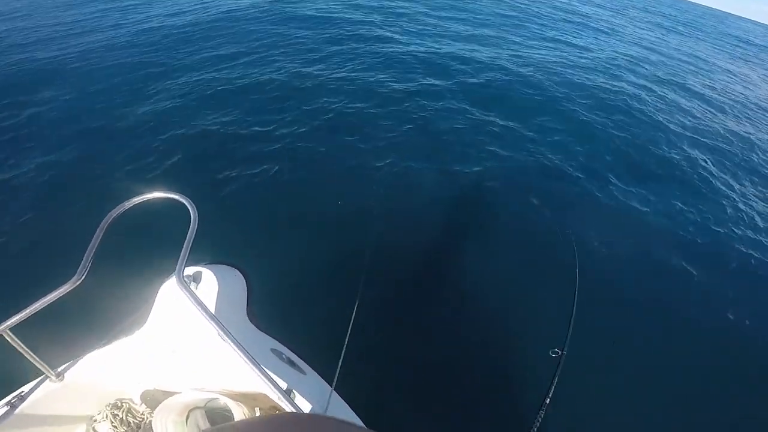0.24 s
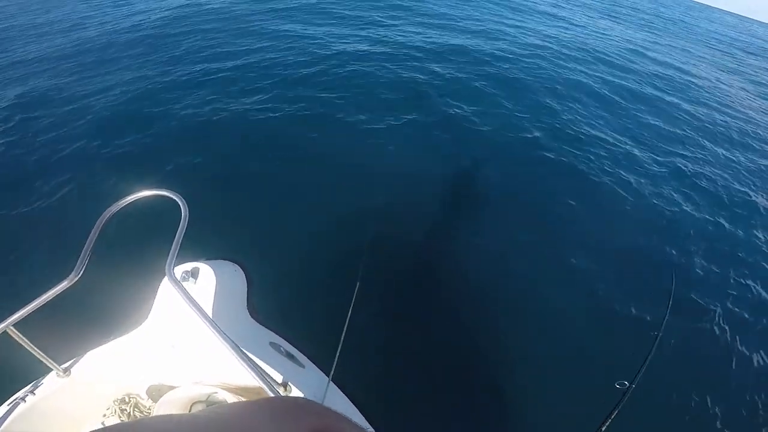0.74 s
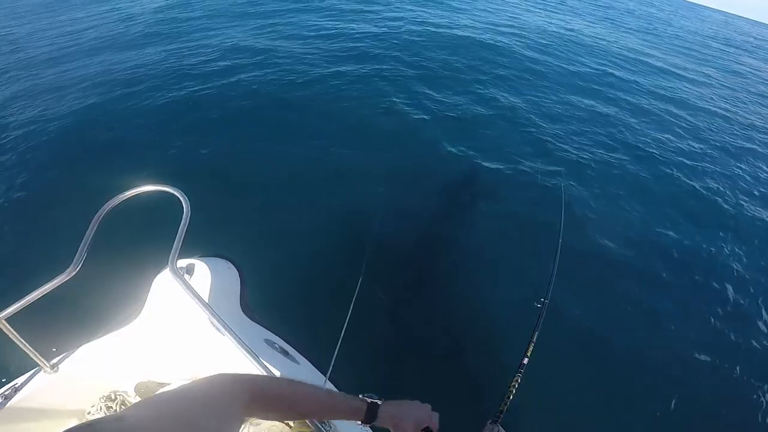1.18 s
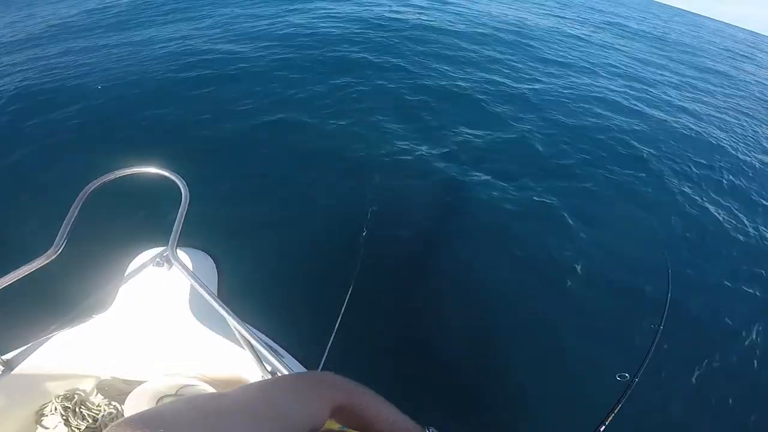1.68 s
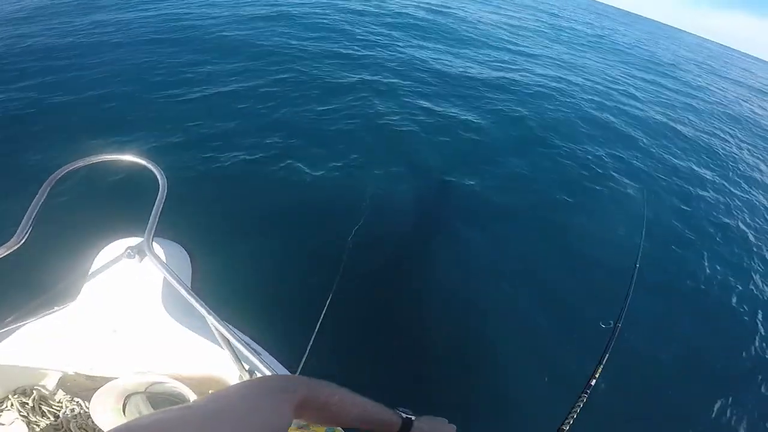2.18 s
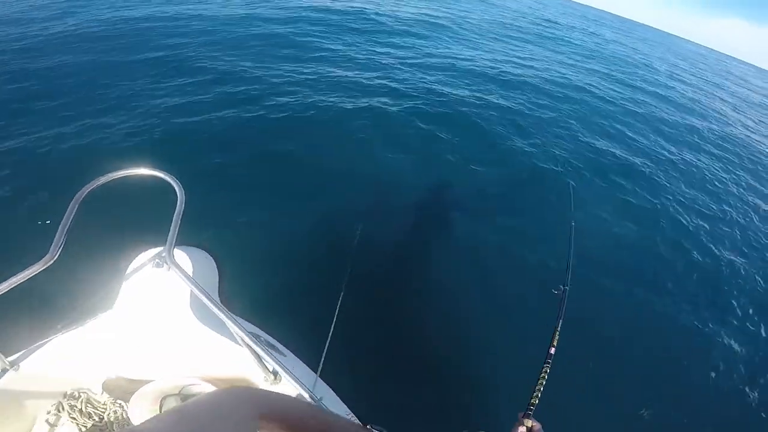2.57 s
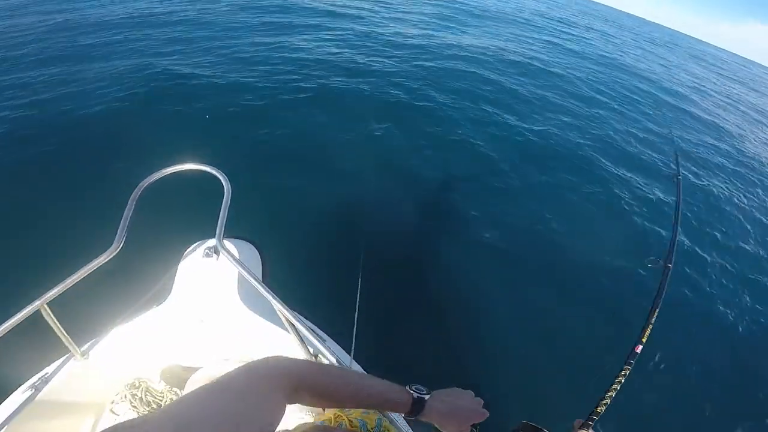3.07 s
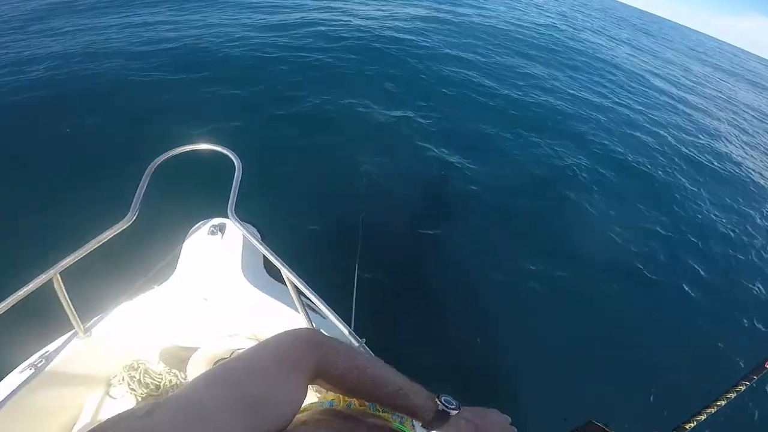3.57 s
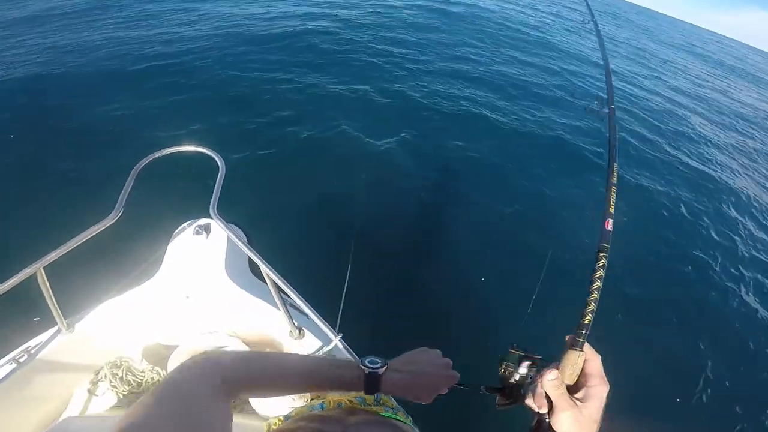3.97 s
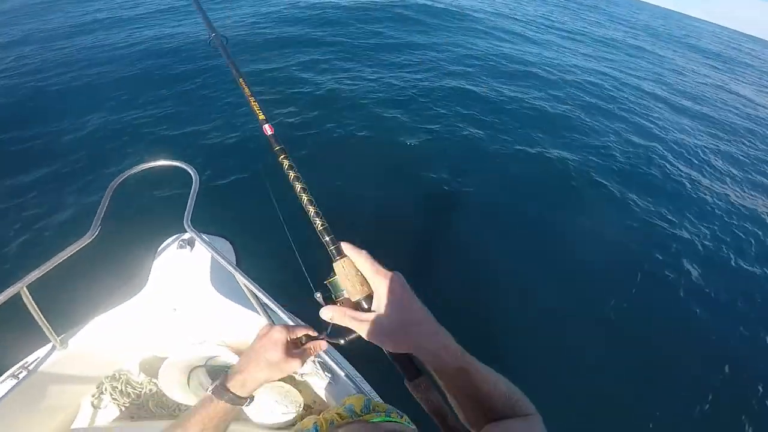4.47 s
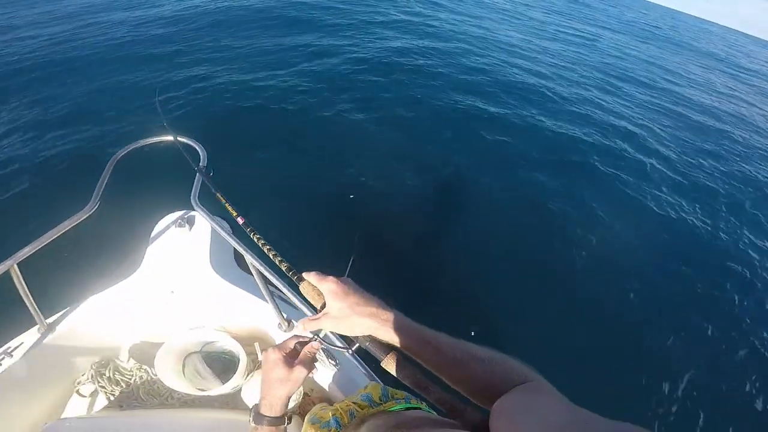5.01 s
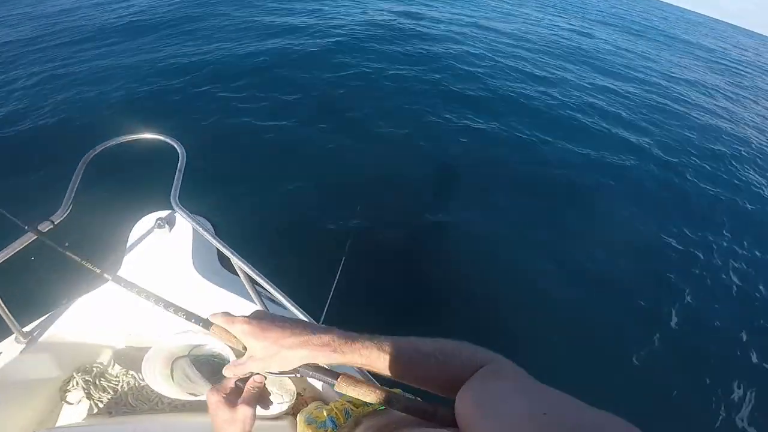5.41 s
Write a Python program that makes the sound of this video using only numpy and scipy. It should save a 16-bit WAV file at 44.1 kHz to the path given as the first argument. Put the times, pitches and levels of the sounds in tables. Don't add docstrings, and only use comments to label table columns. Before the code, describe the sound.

Whirring reel strokes, quick ratchet clicks and hissing line close by, with dull knocks, hollow water slaps and a deep steady drone.

```python
import sys
import numpy as np
from scipy import signal
from scipy.io import wavfile
from scipy.ndimage import uniform_filter1d

SR = 44100
rng = np.random.default_rng(int(sys.argv[2]) if len(sys.argv) > 2 else 0)


def wav_record(signal):
    frames = np.transpose(np.atleast_2d(signal))
    bounded = np.clip(frames, -1, 1)
    quanta = np.round(bounded * 32767).astype(np.int16)
    wavfile.write(sys.argv[1], SR, quanta)


def elevation(decibels):
    levels = np.asarray(decibels, float)
    return 10 ** (levels / 20)


N = 249165
CLOCK = np.arange(N) / SR

# (frequency [Hz], density [dB per Hz])
WIND_SPECTRUM = [(41, -44), (70, -10), (119, -1), (167, 0), (360, -14), (424, -17), (490, -19.5),
                 (700, -26.5), (910, -68), (1540, -120)]
# (frequency [Hz], density [dB per Hz])
DRONE_SPECTRUM = [(20, -13), (32, 16.5), (50, 5.5), (85, -4), (130, -33)]
# (middle [s], width [s], level [dB])
GUSTS = [(0.03, 0.089, -52), (1.28, 0.13, -41.5), (1.56, 0.19, -28.5), (1.8, 0.21, -46.5),
         (2.33, 0.05, -40), (2.85, 0.33, -53), (4.3, 0.6, -52), (4.65, 0.24, -49), (5.0, 0.15, -46.5),
         (5.22, 0.028, -47)]
# (frequency [Hz], density [dB per Hz])
LAPPING_SPECTRUM = [(250, -73), (350, 4.5), (500, -1.5), (800, -1.5), (1200, -8), (1600, -19.5)]
# (frequency [Hz], density [dB per Hz])
WASH_SPECTRUM = [(240, 10.5), (400, -5.5), (510, 1), (828, -20), (907, -3), (1190, -1), (1770, 0),
                 (1930, -3.5), (4250, -11), (6410, -7), (12300, -22), (15000, -0.5)]
# (time [s], peak [dB], centre [Hz], t60 [s])
SPRAY = [
    (3.7, -37.5, 5540, 0.45),
    (0.32, -51, 2600, 0.072),
    (4.96, -47, 3500, 0.29),
]
# (frequency [Hz], density [dB per Hz])
ROCKING_SPECTRUM = [(2.9, -50), (5.0, 3), (15, 3), (26, -13.5), (49, -18.5), (75, -27.5), (90, -66),
                    (120, -97), (200, -120)]
# (time [s], level [dB])
SWAY = [(0.06, -27.5), (0.38, -39.5), (0.58, -25), (0.72, -41), (0.77, -24), (1.13, -48.5), (1.23, -25.5),
        (1.78, -50), (1.81, -25.5), (2.1, -27), (2.4, -28.5), (2.7, -29.5), (3.1, -27), (3.6, -32.5),
        (3.85, -30.5), (4.06, -27), (4.25, -17), (4.83, -31), (4.99, -15), (5.13, -24.5), (5.37, -16.5),
        (5.51, -48.5), (5.65, -25)]
# (time [s], peak [dB], pitch [Hz], t60 [s], noise
# burst near 570 Hz re peak [dB])
WAVELET_BLOWS = [(0.291, -29.5, 170, 0.05, -26), (0.64, -36, 166.5, 0.28, -27), (2.312, -30, 191, 0.055, -25),
                 (2.343, -26, 115.4, 0.11, -27), (2.751, -25.5, 150, 0.049, -26), (2.766, -28, 138, 0.068, -30),
                 (3.7, -12, 190.6, 0.045, -32), (3.72, -25.5, 230, 0.11, -21), (3.745, -27.5, 179.6, 0.2, -23),
                 (4.05, -36, 119, 0.15, -5), (4.973, -24.5, 275, 0.047, -32), (4.966, -23.5, 125.5, 0.08, -33),
                 (4.997, -22, 139.2, 0.1, -33), (0.305, -35, 228, 0.052, -20),
                 (2.406, -38.5, 387, 0.047, -21), (2.6, -44, 303, 0.1, -20), (2.734, -31.5, 430, 0.016, -35),
         (2.753, -36, 425, 0.026, -22), (2.775, -35, 258, 0.075, -24), (3.045, -39.5, 315, 0.023, 1),
         (3.292, -41, 459, 0.061, -1), (4.035, -43.5, 684, 0.045, -17), (4.09, -45, 790, 0.12, -20),
         (3.695, -26.5, 526, 0.032, -24), (3.783, -27.5, 473, 0.024, -20), (4.376, -35.5, 280.4, 0.13, -8),
         (4.958, -33, 490, 0.015, -1), (4.931, -39, 340, 0.042, -12), (5.003, -33, 246, 0.056, -22),
         (5.025, -34.5, 223, 0.1, -23), (5.168, -41, 496, 0.035, -1)]
# (time [s], peak [dB], pitch [Hz], length [s])
DROPS = [(0.049, -43, 1650, .01), (0.056, -45, 1550, .012), (0.089, -38, 1850, .014),
         (0.135, -47, 1250, .012), (0.304, -48, 3200, .008), (0.306, -45, 1550, .01),
         (0.842, -45, 1840, .022), (1.117, -44, 1850, .022), (2.385, -41, 440, .03),
         (2.545, -42, 1950, .02), (2.578, -37, 310, .048), (3.891, -46, 2050, .014),
         (4.005, -46, 3270, .012), (4.033, -46, 2150, .016), (4.083, -44, 1900, .016),
         (4.271, -46, 3350, .014), (4.422, -39, 1900, .018), (4.443, -41, 1870, .016),
         (4.482, -39, 1880, .02), (4.622, -43, 1800, .018), (4.645, -40, 1790, .022)]
# (time [s], peak [dB], pitch [Hz], t60 [s], bright crack re peak [dB])
KNOCKS = [(0.0355, -22, 715, 0.0076, -17), (0.0368, -24.5, 1250, 0.011, -28), (0.297, -41, 423, 0.01, -11),
          (0.566, -44, 497, 0.1, -26), (0.716, -32, 565, 0.025, -22), (0.718, -37, 920, 0.012, -27),
          (1.411, -33.5, 1260, 0.018, -25), (2.3035, -32.5, 763, 0.028, -30),
          (2.3035, -33.5, 614, 0.032, -30), (1.412, -37, 915, 0.042, -32), (3.045, -42, 780, 0.025, -2),
          (4.928, -37.5, 560, 0.011, -8), (4.958, -38, 674, 0.0091, -13),
          (0.296, -40.5, 1730, 0.017, -5), (0.616, -46.5, 1900, 0.11, -9), (1.412, -30.5, 1780, 0.011, -33),
          (1.5234, -26.5, 1610, 0.0038, -14), (1.552, -19, 1010, 0.0054, -22),
          (1.554, -32.5, 4200, 0.0065, -20), (1.574, -19, 1165, 0.018, -32),
          (1.729, -37.5, 1850, 0.0082, -6.5), (3.135, -45.5, 1490, 0.044, -10),
          (4.927, -39, 1650, 0.019, -23), (4.961, -37, 1870, 0.013, -15), (4.992, -40, 1650, 0.018, -10),
          (4.976, -28.5, 1555, 0.014, -29), (5.136, -42, 1770, 0.069, -7)]
# (time [s], peak [dB], pitch [Hz])
SNAPS = [(0.042, -32, 4450), (1.051, -31, 5460), (1.521, -43, 5550), (1.5313, -35, 4700), (1.54, -28, 5800),
         (1.554, -34, 4100), (2.9027, -26, 5300), (3.042, -32, 5550), (3.702, -24, 5050),
         (3.919, -30, 5300), (4.0106, -24, 4750), (4.0923, -20, 6830), (4.3514, -31, 6330),
         (5.004, -32, 5500), (5.0835, -22.5, 5620)]
# (start [s], teeth [count], first gap [ms], gap change [ms per tooth])
SLIPS = [(0.0766, 4, 34.8, -5.35), (0.1902, 10, 28.6, -1.38), (0.4204, 8, 24.3, 1.08),
         (0.6412, 9, 22.6, -1.48), (0.7971, 9, 14.2, 1.31), (0.9799, 4, 43.6, 7.3),
         (1.1951, 3, 57.9, -22.4), (1.3175, 5, 20.2, -2.91), (1.3991, 9, 11.6, 2.2),
         (1.5832, 6, 27.7, -1.09), (1.7296, 9, 17.9, -0.02), (2.409, 4, 16.9, 1.05),
         (2.4914, 4, 24.4, 2.05), (2.5896, 8, 18.2, 2.46), (2.7971, 5, 25.4, -2.63),
         (2.9387, 7, 22.0, -1.72), (3.0649, 12, 20.4, 0.21), (3.3188, 6, 26.8, -0.62),
         (3.9559, 6, 24.3, -0.86), (4.1202, 5, 16.1, 2.51), (4.2165, 7, 16.3, -0.24),
         (4.7786, 9, 17.0, 0.03), (4.9276, 7, 18.3, 0.19), (5.0666, 4, 29.5, -4.1), (5.177, 8, 27.9, -1.8),
         (5.3546, 6, 19.6, 0.99)]
# (time [s], tick level [dB])
PULL = [(0.05, -50.5), (.38, -42), (.6, -45), (1.0, -43), (1.4, -45), (1.8, -46), (2.5, -57), (2.8, -44),
        (3.05, -44.5), (3.35, -45.5), (4.0, -41), (4.3, -46), (4.9, -43.5), (5.15, -45.5), (5.29, -47),
        (5.45, -45.5)]
# (frequency [Hz], t60 [s], level [dB])
PAWL_MODES = [(3005, 0.049, -10.5), (5300, 0.049, -9.5), (6400, 0.021, -4), (7150, 0.012, -6),
              (8670, 0.012, -5.5)]
# (start [s], length [s], pitch [Hz], level [dB])
RUBS = [(0.96, 0.38, 5000, -56), (2.192, 0.16, 5000, -52), (3.453, 0.38, 2780, -50.5),
        (3.47, 0.39, 6200, -51), (3.583, 0.19, 6700, -46.5), (4.326, 0.11, 4200, -54),
        (4.5, 0.12, 4500, -48), (4.544, 0.2, 5300, -58), (5.46, 0.19, 5500, -52), (5.541, 0.2, 5600, -44.5),
        (5.554, 0.09, 3140, -46), (3.786, 0.12, 5470, -51), (3.792, 0.089, 6800, -44),
        (4.327, 0.14, 2200, -50), (3.98, 0.19, 2260, -53), (4.0, 0.15, 3100, -54), (2.43, 0.21, 1580, -55),
        (3.99, 0.19, 1610, -52), (5.513, 0.25, 2050, -53), (4.02, 0.26, 1250, -54.5)]
# (frequency [Hz], width [Hz], level [dB])
SPOOL_MODES = [(4200, 440, 4), (4746, 130, 9.5), (5550, 350, 13), (6240, 82, 10.5), (6700, 36, 7),
               (3600, 1900, -1), (2990, 880, -6), (1900, 450, 6.5)]
# (frequency [Hz], width [Hz], level [dB])
BODY_MODES = [(1840, 92, 19.5), (1560, 70, 9), (2120, 70, 11), (2610, 70, 5)]
# (time [s], pitch ratio [1])
GRIP = [(.6, 1.03), (1.2, 0.99), (1.8, 0.92), (1.9, 1.02), (1.98, 1.05), (2.1, 0.97), (2.26, 1),
        (2.42, 0.97), (2.53, 0.94), (2.8, 1.03), (3.58, 0.97), (3.77, 1.06), (3.9, .96), (4.2, 1),
        (4.34, 0.95), (4.44, 0.94), (4.52, 0.97), (4.61, 0.93), (4.7, 0.95)]
# (start [s], length [s], gear whirr [dB], line hiss [dB], mesh tone [dB])
PUSHES = [(0.634, 0.36, -46.5, -48.5, -53), (0.949, 0.33, -49, -45, -56), (1.275, 0.17, -52.5, -51, -67),
          (1.747, 0.3, -51.5, -55, -67), (1.845, 0.27, -41.5, -50, -51), (1.991, 0.22, -43, -51.5, -65),
          (2.17, 0.34, -44, -47.5, -55), (2.426, 0.16, -49, -49, -55), (2.486, 0.33, -45, -47, -53.5),
          (2.75, 0.27, -61, -52.5, -67), (3.085, 0.15, -59, -59, -54), (3.227, 0.14, -53, -52.5, -59),
          (3.396, 0.14, -59, -52, -71), (3.464, 0.22, -46.5, -45, -47.5),
          (3.603, 0.24, -43.5, -42.5, -48.5), (3.779, 0.14, -55, -45.5, -47),
          (3.849, 0.17, -48.5, -45.5, -58), (3.955, 0.17, -48, -50, -56), (4.037, 0.26, -52, -47.5, -52.5),
          (4.225, 0.25, -55, -43.5, -46.5), (4.298, 0.12, -43.5, -55, -62), (4.389, 0.19, -42.5, -45, -48),
          (4.503, 0.16, -51, -46, -48), (4.576, 0.15, -41, -45.5, -51), (4.647, 0.18, -61, -47, -53),
          (5.433, 0.14, -58, -52, -50.5), (5.494, 0.13, -49, -47.5, -46.5), (5.56, 0.3, -64, -47, -46)]
# (time [s], rate [Hz])
CRANK_STROKES = [
    [(.6, 1090), (.72, 1900), (.8, 1550), (1.0, 2480), (1.21, 2580), (1.26, 1970)],
    [(1.86, 1520), (1.94, 2580), (2.08, 2400), (2.15, 1590), (2.24, 2790), (2.42, 1960), (2.46, 1630),
     (2.7, 1510), (2.86, 880)],
    [(3.45, 1090), (3.52, 1290), (3.59, 1690), (3.77, 1730), (3.81, 1510), (3.92, 990), (4.03, 1170),
     (4.09, 2150), (4.19, 2250)],
    [(4.25, 1180), (4.31, 1340), (4.36, 2040), (4.44, 1900), (4.55, 1790), (4.65, 1660), (4.69, 1420),
     (4.78, 990)],
    [(5.44, 695), (5.49, 1143), (5.522, 1320), (5.555, 2590), (5.6, 2460), (5.65, 2760)],
]
# (frequency [Hz], lead of the left port [rad])
PORT_PHASE = [(0, 0), (690, -3.1), (1290, -3.4), (1890, -4.9), (2670, -4.0), (3270, -5.6), (4310, -6.3),
              (5940, -8.5), (6460, -9.4), (7150, -8.6), (8530, -11.6), (9040, -10.4), (11300, -12.6),
              (14700, -12.7)]
# (frequency [Hz], left minus right [dB])
PORT_BALANCE = [(500, -2), (1000, -4), (2400, -1.5), (5000, -3), (9000, -4), (14000, 0)]
# (frequency [Hz], likeness [1])
PORT_COHERENCE = [(400, .3), (700, .5), (1200, .85), (2400, .38), (5000, .55), (9000, .15), (14000, .05)]

BREEZE_DB, DRONE_DB, LAPPING_DB, WASH_DB = -49.5, -43.5, -54, -47
HUM_HZ, HUM_WIDTH_HZ, HUM_DB = 103, 8, -46
SLOSH_LAG_S = 0.012
RUB_WIDTH_HZ = 380
ATTACK_S, RELEASE_S, SAG_DB_PER_S = 0.069, 0.084, 17
NEAR_BODY_DB_PER_OCTAVE = 2
TOP_HZ = 10830


def evened(x):
    return x / np.sqrt(np.mean(x ** 2) + 1e-20)


def steadied(x, size):
    return x / np.sqrt(uniform_filter1d(x ** 2, size=size) + 0.45)


def smoothed(x, size):
    return evened(uniform_filter1d(x, size=size))


def read(points, hz):
    f, value = np.transpose(points)
    return np.interp(np.log(hz + 1), np.log(f + 1), value)


def curve(points):
    return np.interp(CLOCK, *np.transpose(points))


def add(mix, s, sound):
    part = mix[round(s * SR):][:len(sound)]
    part += sound[:len(part)]


def layered(*sounds):
    out = np.zeros(max(map(len, sounds)))
    for sound in sounds:
        add(out, 0, sound)
    return out


def resonate(x, hz, width):
    turn = np.exp(2j * np.pi * np.cumsum(hz * np.ones(len(x))) / SR)
    r = np.exp(-np.pi * abs(width) / SR)
    return 2 * (turn * signal.lfilter([1 - r], [1, -r], x / turn)).real


def ring(hz, t60, rise_s):
    t = CLOCK[:round(SR * np.clip(t60, .002, .25))]
    envelope = elevation(-60 * t / max(t60, .002)) * (1 - np.exp(-t / abs(rise_s)))
    wave = envelope * np.sin(2 * np.pi * hz * t)
    return wave / abs(wave).max()


def burst(hz, width, t60):
    puff = rng.standard_normal(SR // 4)[:round(SR * np.clip(t60, .002, .25))]
    coloured = resonate(resonate(puff, hz, width), hz, width)
    return 2.8 * coloured * elevation(-60 * CLOCK[:len(puff)] / t60)


def noise(spectrum, patchy_db, flicker_db, size, channels=1):
    frames, hz = 4 * N // size + 5, np.fft.rfftfreq(size, 1 / SR)
    a, b, patches = rng.standard_normal((3, channels, len(hz), frames))
    patches = evened(uniform_filter1d(uniform_filter1d(patches, size=5, axis=1), size=8, axis=2))
    flicker = smoothed(rng.standard_normal(frames), 3)
    level = read(spectrum, hz)[:, None] + patchy_db * patches + flicker_db * flicker
    z = (a + 1j * b) * elevation(level)
    return evened(signal.istft(z, nperseg=size, noverlap=3 * size // 4)[1][:, :N])


def wind():
    turbulence = noise(WIND_SPECTRUM, patchy_db=0.5, flicker_db=-0.5, size=2048, channels=3)
    left, right, shared = steadied(turbulence, size=3000)
    drone = noise(DRONE_SPECTRUM, patchy_db=-1.0, flicker_db=1.5, size=4096, channels=3)
    blowing = elevation(BREEZE_DB)
    for s, width, db in GUSTS:
        blowing = blowing + elevation(db) * np.exp(-((CLOCK - s) / width) ** 2)
    low = signal.sosfiltfilt(signal.butter(2, 240, fs=SR, output="sos"), shared)
    opposed = (shared - low) * [[1], [-1]]
    gusts = blowing * (np.array([left, right]) + 0.54 * low + 0.44 * opposed)
    return gusts + elevation(DRONE_DB) * (drone[2] + .4 * drone[:2])


def water():
    swell = smoothed(uniform_filter1d(rng.standard_normal(N), size=4000), 4000)
    lapping = noise(LAPPING_SPECTRUM, patchy_db=1.0, flicker_db=-1.5, size=1024)[0]
    wash = noise(WASH_SPECTRUM, patchy_db=0.5, flicker_db=-1.5, size=512)[0]
    return elevation(LAPPING_DB + 1.5 * swell) * lapping + elevation(WASH_DB) * wash


def spray():
    out = np.zeros(N)
    for s, db, hz, t60 in SPRAY:
        fine = 0.21 * burst(2.1 * hz, 3500, 0.5 * t60)
        add(out, s, elevation(db) * layered(burst(hz, 1800, t60), fine))
    return out


def wavelets():
    out = np.zeros(N)
    for s, db, hz, t60, upper_db in WAVELET_BLOWS:
        slosh = 1.6 * burst(0.8 * hz, 175, 2.0 * t60)
        slosh *= 1 - np.exp(-CLOCK[:len(slosh)] / SLOSH_LAG_S)
        lingering = 0.043 * ring(1.45 * hz, 5.8 * t60, 0.017)
        upper = elevation(upper_db) * burst(570, 260, 0.068)
        blow = layered(ring(hz, t60, 0.00063), lingering, upper)
        add(out, s + 0.00047, elevation(db) * blow)
        add(out, s + SLOSH_LAG_S, elevation(db) * slosh)
    return out


def hull():
    sway = elevation(curve(SWAY))
    motion = noise(ROCKING_SPECTRUM, patchy_db=-3.5, flicker_db=-1.0, size=8192, channels=2)
    rocking, twist = steadied(motion, size=5000)
    hum = steadied(evened(resonate(rng.standard_normal(N), HUM_HZ, HUM_WIDTH_HZ)), size=20000)
    common = sway * rocking + elevation(HUM_DB) * hum + wavelets()
    return common * elevation(np.array([[-.9], [.9]])) + 0.14 * sway * twist * [[1], [-1]]


def drops():
    out = np.zeros(N)
    for s, db, hz, length in DROPS:
        t = CLOCK[:round(SR * np.clip(length, .004, .05))]
        add(out, s, elevation(db) * np.hanning(len(t)) * np.sin(2 * np.pi * hz * t))
    return out


def knocks():
    out = np.zeros(N)
    for s, db, hz, t60, crack_db in KNOCKS:
        upper = 0.1 * ring(1.36 * hz, .5 * t60, 0.0001)
        lower = 0.21 * ring(0.66 * hz, 1.03 * t60, 0.00051)
        scatter = .3 * burst(hz, 1200, 0.06)
        crack = 0.78 * elevation(crack_db) * burst(4600, 3200, 0.021)
        blow = layered(ring(hz, t60, 0.00042), upper, lower, scatter, crack)
        add(out, s + 0.00064, elevation(db) * blow)
    return out


def snaps():
    out = np.zeros(N)
    for s, db, hz in SNAPS:
        thin = 0.18 * ring(hz, 0.017, 0.00016)
        crack = 0.53 * burst(hz, 4800, 0.0028)
        sizzle = 0.07 * burst(11000, 3700, 0.0024)
        add(out, s, elevation(db) * layered(thin, crack, sizzle))
    return out


def pawl():
    out = np.zeros(N)
    for start, teeth, gap_ms, change_ms in SLIPS:
        for k, tint in enumerate(rng.standard_normal((round(teeth), len(PAWL_MODES)))):
            s = start + (k * gap_ms + change_ms * k * (k - 1) / 2) / 1000
            modes = []
            for (hz, t60, db), u in zip(PAWL_MODES, tint):
                modes.append(elevation(db + 0.5 * u) * ring(hz * (1 + 0.0363 * u), t60, 0.000067))
            add(out, s, layered(*modes, 0.49 * burst(4400, 2700, 0.0053)))
    return out * elevation(curve(PULL))


def effort(length):
    t = np.arange(0, length, 1 / SR)
    edges = np.clip(np.minimum(t / ATTACK_S, (length - t) / RELEASE_S), 0, 1)
    return np.sin(np.pi / 2 * edges) ** 2 * elevation(-SAG_DB_PER_S * t)


def guide_rubs(friction):
    out = np.zeros(N)
    for s, length, hz, db in RUBS:
        push = effort(length)
        rub = friction[round(s * SR):][:len(push)]
        squeak = resonate(resonate(rub, hz, RUB_WIDTH_HZ), hz, RUB_WIDTH_HZ)
        add(out, s, elevation(db) * push[:len(rub)] * evened(squeak))
    return out


def spool_hiss(line):
    drift = rng.standard_normal((len(SPOOL_MODES), N))
    loads = elevation(3.0 * smoothed(drift, 4000))
    out = np.zeros(N)
    for load, (hz, width, db) in zip(loads, SPOOL_MODES):
        out += load * elevation(db) * resonate(line, hz, width)
    return evened(out)


def crank():
    return curve(np.vstack(CRANK_STROKES))


def mesh():
    hz, slip = crank(), rng.standard_normal(N)
    tone = steadied(evened(resonate(resonate(slip, hz, 130), hz, 130)), size=1500)
    tone *= elevation(1.8 * smoothed(rng.standard_normal(N), 500))
    return tone + 0.31 * evened(resonate(slip, 2 * hz, 230))


def gear_whirr(teeth):
    grip = curve(GRIP)
    body = np.zeros(N)
    for hz, width, db in BODY_MODES:
        mode = resonate(resonate(teeth, hz * grip, width), hz * grip, 1.4 * width)
        body += elevation(db) * evened(mode)
    octaves_off = abs(np.log2(crank() / BODY_MODES[0][0]))
    return elevation(-NEAR_BODY_DB_PER_OCTAVE * octaves_off) * steadied(evened(body), size=4000)


def winding():
    whirr, hiss, whine = np.zeros((3, N))
    for s, length, whirr_db, hiss_db, mesh_db in PUSHES:
        push = effort(length)
        add(whirr, s, elevation(whirr_db) * push)
        add(hiss, s, elevation(hiss_db) * push)
        add(whine, s, elevation(mesh_db) * push)
    rough = elevation(1.37 * smoothed(rng.standard_normal(N), 600))
    teeth, line = rough * rng.standard_normal((2, N))
    reel = whirr * gear_whirr(teeth) + hiss * spool_hiss(line) + whine * mesh()
    return reel + guide_rubs(rough * line)


def ports(x, diffuse, aside_db):
    hz, _, z = signal.stft(x, SR, nperseg=256, noverlap=192)
    same = read(PORT_COHERENCE, hz)[:, None] ** diffuse
    lead = read(PORT_PHASE, hz)[:, None]
    tilt = read(PORT_BALANCE, hz)[:, None] + aside_db
    drift = uniform_filter1d(uniform_filter1d(rng.standard_normal(z.shape), size=3, axis=0), size=24, axis=1)
    scatter = np.exp(3j * evened(drift))
    left = elevation(tilt / 2) * (same * np.exp(1j * lead) + np.sqrt(1 - same ** 2) * scatter)
    middle = np.sqrt(elevation(tilt) + elevation(-tilt) + 2 * same * np.cos(lead)) / 2
    pair = np.array([left * z, elevation(-tilt / 2) * z]) / middle
    return signal.istft(pair, SR, nperseg=256, noverlap=192)[1][:, :N]


def scene():
    around = ports(water() + spray() + snaps() + pawl() + winding(), diffuse=1.12, aside_db=2.0)
    beside = ports(knocks() + drops(), diffuse=1.0, aside_db=-3.0)
    return wind() + hull() + around + beside


def top_cut(x):
    return signal.sosfilt(signal.butter(12, 14950, fs=SR, output="sos"), x)


def record(dry):
    dull = signal.sosfilt(signal.butter(4, TOP_HZ, fs=SR, output="sos"), dry - dry.mean())
    return top_cut(dull)


dry = scene()
out = record(dry)
wav_record(out)
```